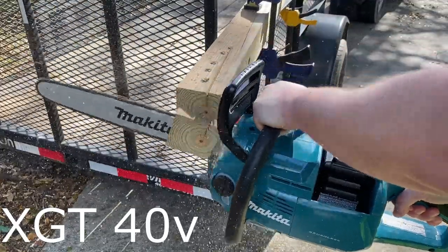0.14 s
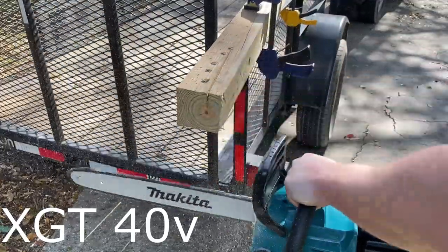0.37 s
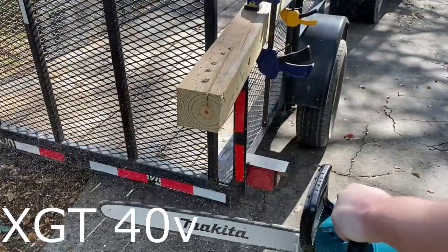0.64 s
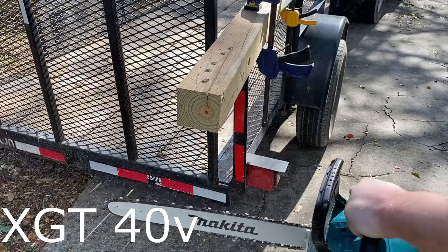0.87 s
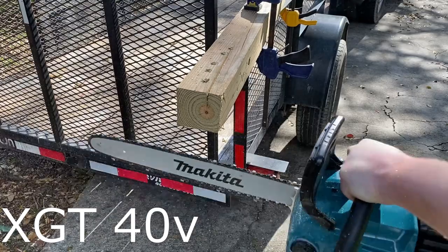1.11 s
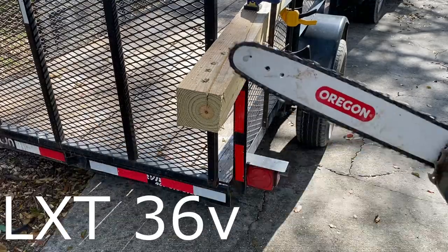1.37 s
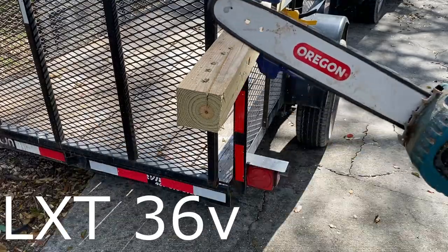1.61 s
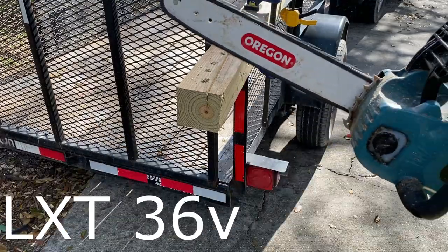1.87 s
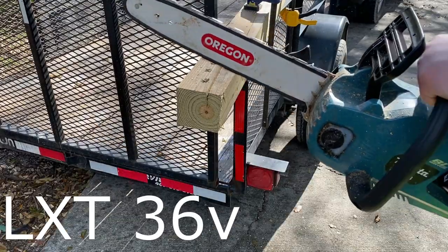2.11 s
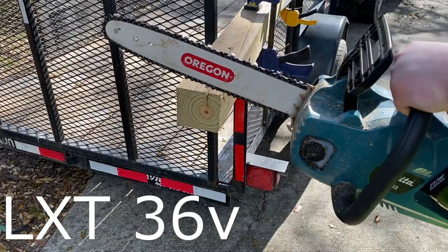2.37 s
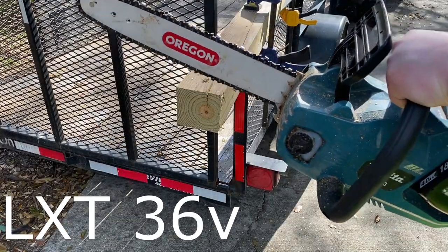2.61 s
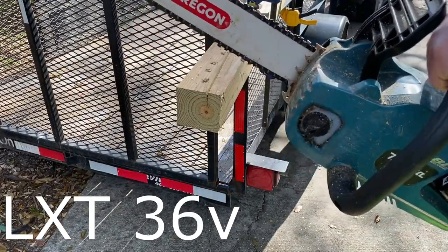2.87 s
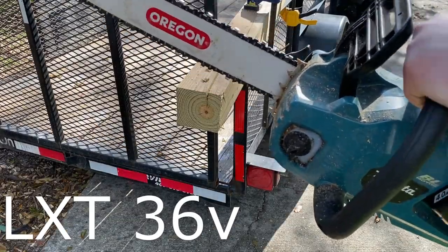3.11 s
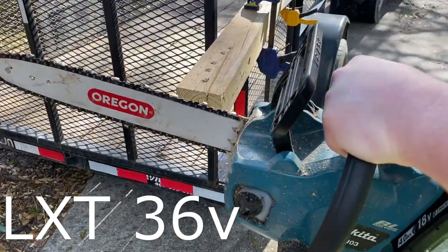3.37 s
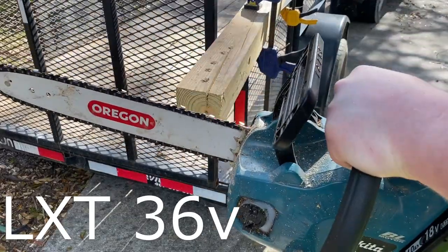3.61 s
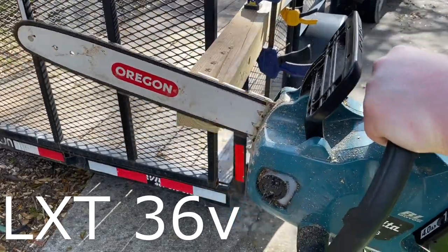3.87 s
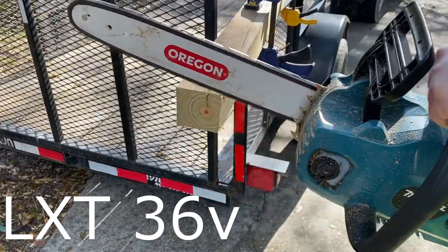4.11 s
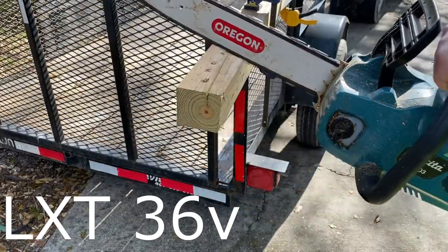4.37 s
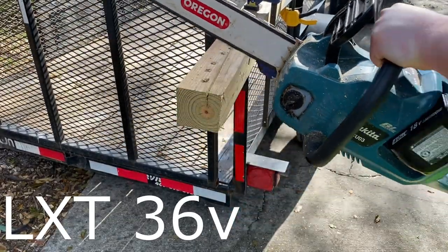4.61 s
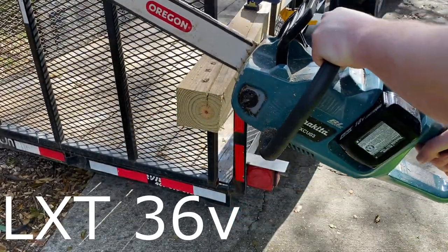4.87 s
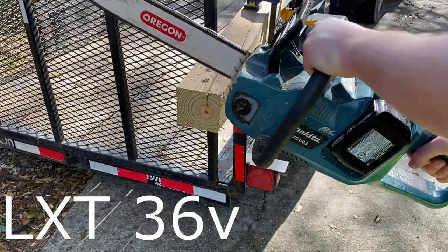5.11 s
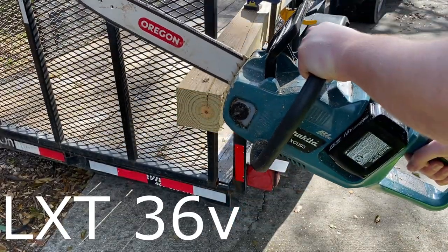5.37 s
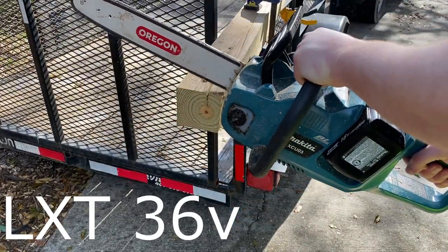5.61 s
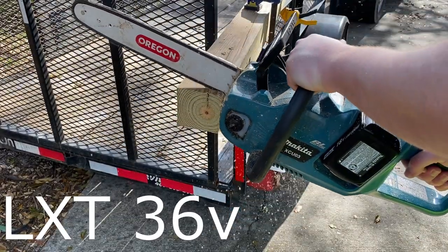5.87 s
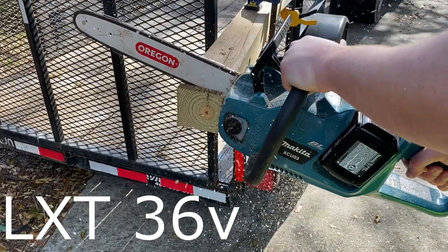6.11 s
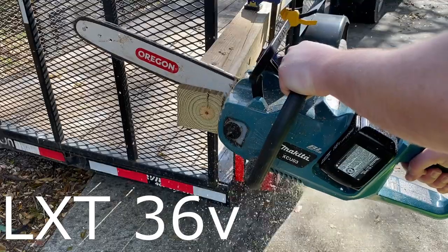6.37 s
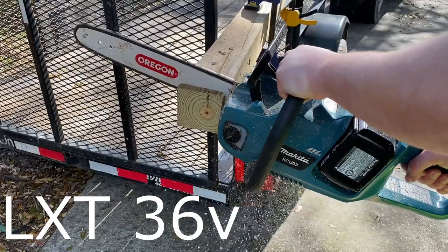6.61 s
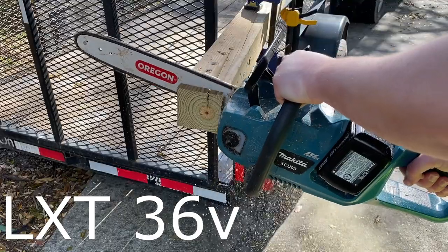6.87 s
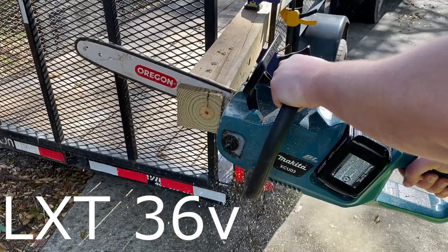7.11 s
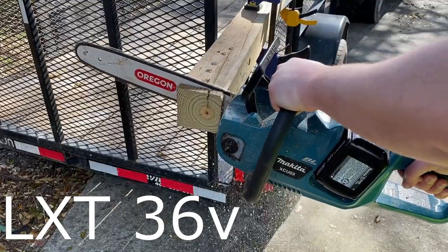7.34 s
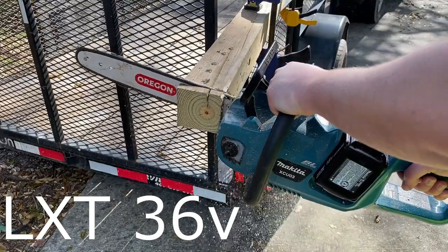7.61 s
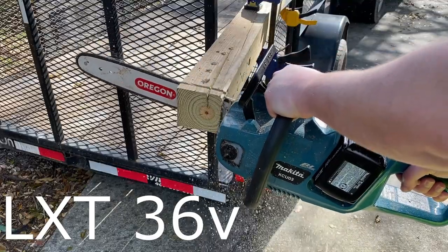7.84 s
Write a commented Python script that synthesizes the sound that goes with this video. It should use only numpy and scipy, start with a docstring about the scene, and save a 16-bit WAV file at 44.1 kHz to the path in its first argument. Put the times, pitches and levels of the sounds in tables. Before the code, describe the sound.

A cordless chainsaw finishes a cut and brakes as the offcut knocks down, then a second saw blips, revs up and grinds into a wooden post.

```python
"""Two cordless chainsaws and a wooden post

Outdoors, one saw finishes a cut and brakes; the offcut falls and bounces. A second saw is blipped twice,
handled in between, then run up and fed into the post, where load drags the whine down.
Saws: noise gated at the tooth rate plus sines at its multiples; knocks: decaying noise bursts; cut: moving
resonances struck by the cutters. Filtered-noise wind and hiss lie underneath; a close mono input overloads softly."""
import sys
import numpy as np
from scipy import signal
from scipy.io import wavfile
from scipy.ndimage import uniform_filter1d

SR = 44100
rng = np.random.default_rng(int(sys.argv[2]) if len(sys.argv) > 2 else 0)


def wav_out(sig):
    """Save sig, one row per channel (or a flat mono array), as 16-bit PCM at SR to the path in sys.argv[1]."""
    wavfile.write(sys.argv[1], SR, np.round(np.clip(np.atleast_2d(sig).T, -1, 1) * 32767).astype(np.int16))


def convert_level_to_amplitude(level_db):
    """Map a level in decibels to its linear amplitude factor."""
    exponent = np.asarray(level_db, float) / 20
    return 10 ** exponent


N = 351918

# second saw's blip, run-up and cut: t/s, tooth rate/(1/s)
BLIP_AND_CUT = [(3.542, 41.3), (3.632, 105), (3.7, 245), (3.77, 449), (3.84, 675), (3.874, 780),
                (3.936, 876), (4.01, 935), (4.062, 887), (4.144, 780), (4.35, 481), (4.5, 266),
                (4.554, 325), (4.67, 695), (4.732, 857), (4.79, 945), (4.866, 1000), (4.978, 1045),
                (5.1, 1077), (5.8, 1073), (5.92, 1033), (6.04, 1000), (6.13, 950), (6.23, 926), (6.38, 922),
                (6.48, 902), (6.69, 888), (6.95, 902), (7.16, 920.5), (7.54, 920), (7.74, 889), (7.78, 860),
                (7.81, 878), (7.98, 894)]
# response of the second housing to a whine: f/Hz, gain/dB
SECOND_HOUSING = [(200, -25), (480, 0), (600, -5), (780, -6), (850, -5), (970, 3), (1090, 0), (1160, -7),
                  (1280, 3), (1400, 7), (1540, 3), (1660, -7), (1770, -2), (1880, -4), (2070, 2),
                  (2300, -8), (2450, -3), (2800, -9), (3300, -3), (3900, 4), (4300, -3.5)]


def evened(x):
    """Scales to rms 1."""
    return x / np.sqrt(np.mean(x ** 2) + 1e-20)


def read(points, x):
    """Interpolates (x, value) points on a log x axis."""
    at, value = np.transpose(points)
    return np.interp(np.log(x + 1), np.log(at + 1), value)


def add(mix, start_s, sound):
    """Mixes a sound in at start_s."""
    part = mix[round(start_s * SR):][:len(sound)]
    part += sound[:len(part)]


def drift(size, hz):
    """Low-passed noise of rms 1 with rates up to about hz."""
    low_pass = signal.butter(2, hz, fs=SR, output="sos")
    return evened(signal.sosfilt(low_pass, rng.standard_normal(size)))


def resonate(x, hz, width_hz):
    """One-pole resonance: shifts the curve hz down to zero, smooths, and shifts back."""
    turn = np.exp(2j * np.pi * np.cumsum(hz * np.ones(len(x))) / SR)
    r = np.exp(-np.pi * width_hz / SR)
    return 2 * (turn * signal.lfilter([1 - r], [1, -r], x / turn)).real


def tone(hz, db, waver_db):
    """A sine on a pitch curve whose strength wavers."""
    turns = np.cumsum(hz) / SR + rng.random()
    strength = convert_level_to_amplitude(db + waver_db * drift(len(hz), 40))
    return np.sqrt(2) * strength * np.sin(2 * np.pi * turns)


def coloured(x, field_db, size=512):
    """Weights each short-time spectrum of x by field_db(Hz, s)."""
    overlap = size * 3 // 4
    hz, s, z = signal.stft(x, SR, nperseg=size, noverlap=overlap)
    weighted = z * convert_level_to_amplitude(field_db(hz[:, None], s))
    return signal.istft(weighted, SR, nperseg=size, noverlap=overlap)[1][:len(x)]


def yard():
    """Distant hiss, faint tones and lumpy wind on the microphone: shaped noise and sines."""
    # distant hiss: f/Hz, relative level/dB
    hiss_colour = [(71, -34), (120, -12.5), (160, -19), (189, -18), (343, -22), (1110, -25.5),
                   (1810, -37.5), (1970, -28), (2090, -34), (9590, -46), (16400, -68)]
    # wind on the microphone: f/Hz, relative level/dB
    wind_colour = [(2.9, -30), (5.0, -2.5), (16, 0), (59, -13), (118, -18), (161, -34.5), (250, -48.5),
                   (320, -80.5), (550, -120)]
    # thin tones from far off: f/Hz, level/dB once swelled in
    far_tones = [(1114, -76), (1911, -70.5), (1997, -80.5), (3822, -83.5)]
    t = np.arange(N) / SR
    hiss = evened(coloured(rng.standard_normal(N), lambda hz, s: read(hiss_colour, hz) + 0 * s, size=1024))
    wind = evened(coloured(rng.standard_normal(N), lambda hz, s: read(wind_colour, hz) + 0 * s, size=8192))
    swell = np.clip(t - 1.27, .1, .4) / .4  # after the first saw
    hum = sum(tone(np.full(N, hz), db, 1.2) for hz, db in far_tones) * swell
    hiss_db = -57 + 4 * (t < 1.27)  # stronger at first
    wind_db = -40 + 2.7 * drift(N, 4.9)
    return convert_level_to_amplitude(hiss_db) * hiss + convert_level_to_amplitude(wind_db) * wind + hum


def echoes(x, level_db, t60_s):
    """Trailer, ground and fences send back a short, dull tail: convolution with decaying noise."""
    t = np.arange(0, .4, 1 / SR)
    noise = resonate(rng.standard_normal(len(t)), 2000, 9000)
    tail = noise * convert_level_to_amplitude(-60 * t / t60_s) * (t > .008)
    return convert_level_to_amplitude(level_db) * signal.fftconvolve(x, tail / np.linalg.norm(tail))[:N]


def knocks():
    """Each knock is a dying band of noise; wood and links share one decay each, hand knocks have their own."""
    # falling wood: t/s, level/dB before the common trim, centre f/Hz, width/Hz
    offcut = [(.548, 2, 2700, 3000), (.819, -10, 2300, 700), (.944, -40, 3020, 900),
              (1.007, -26, 2500, 4000), (1.014, -25, 1000, 1800)]
    # trigger and first links at a start: t/s, level/dB before the common trim, centre f/Hz
    links = [(1.273, -27, 1400), (1.293, -27, 800), (1.312, -28, 1500), (1.331, -28, 4550),
             (3.543, -42, 1500), (3.557, -20, 1960), (3.577, -33, 1400), (3.597, -26, 1500),
             (3.611, -22, 1300), (3.629, -19, 1500)]
    # hands on the housing: t/s, level/dB before the common trim, centre f/Hz, t60/s
    hands = [(2.558, -39, 5000, .013), (2.713, -29, 3000, .1), (2.719, -24, 7000, 0.15),
             (2.735, -18, 1200, 0.045), (2.742, -27, 2000, .06), (2.76, -36, 7500, 0.3),
             (2.856, -44, 6000, 0.092), (2.991, -36, 4000, .12), (3.003, -20, 3000, 0.057),
             (3.052, -40, 5000, .04), (3.169, -22, 6000, 0.013), (3.501, -43, 2500, 0.024)]
    rows = [(s, db, hz, .07, width_hz) for s, db, hz, width_hz in offcut]
    rows += [(*row, .06, 2500) for row in links]
    rows += [(*row, 4500) for row in hands]
    mix, t = np.zeros(N), np.arange(0, .3, 1 / SR)
    trim_db, attack_s = -6.0, 0.00062
    for s, db, hz, t60_s, width_hz in rows:
        burst = evened(resonate(rng.standard_normal(len(t)), hz, width_hz))
        decay = convert_level_to_amplitude(db + trim_db - 60 * t / t60_s)
        add(mix, s, decay * burst * np.minimum(t / attack_s, 1))
    band = signal.butter(2, (250, 11000), "band", fs=SR, output="sos")
    return signal.sosfilt(band, mix)


def bar_ring():
    """The first bar rings on after the brake: a decaying sine."""
    mix, t = np.zeros(N), np.arange(0, .38, 1 / SR)
    start_s, hz, peak_db, t60_s = (.86, 4662, -45, .75)
    ring = convert_level_to_amplitude(peak_db - 60 * t / t60_s) * np.sin(2 * np.pi * hz * t)
    add(mix, start_s, ring * signal.windows.tukey(len(t), .1))
    return mix


def electrics():
    """Windings sing on a rising sine as current surges; the drive whistles as narrow-band noise."""
    # winding surges: t/s, length/s, first f/Hz, starting level/dB before the housing
    surges = [(1.347, .125, 720, -22), (3.661, 0.11, 850, -24), (4.503, 0.09, 1680, -25)]
    # drive whistle at a start: from t/s, to t/s, f/Hz, level/dB
    switching = [(1.274, 1.35, 8050, -49), (3.543, 3.658, 8150, -47)]
    mix = np.zeros(N)
    rise_hz_per_s, fade_db = 22800, -9
    for s, length_s, first_hz, db in surges:
        t = np.arange(0, length_s, 1 / SR)
        hz = first_hz + rise_hz_per_s * t
        level_db = db + read(SECOND_HOUSING, hz) + fade_db * t / length_s
        add(mix, s, tone(hz, level_db, 2.2) * signal.windows.tukey(len(t), .3))
    for start_s, end_s, hz, db in switching:
        noise = rng.standard_normal(round((end_s - start_s) * SR))
        whistle = resonate(resonate(noise, hz, 300), hz, 300)
        add(mix, start_s, convert_level_to_amplitude(db) * evened(whistle))
    return mix


def kerf():
    """Left and right cutters, one each in four teeth, rasp the wood and excite moving resonances."""
    # face of the post, then air in the deepening slot; each: t/s, f/Hz, level/dB
    resonances = [
        [(5.82, 1617, -29), (5.9, 1536, -30), (6.03, 1500, -16), (6.1, 1430, -20), (6.2, 1400, -38)],
        [(6, 3900, -32), (6.3, 4000, -35), (6.5, 4776, -20), (6.8, 4584, -35), (7.2, 4980, -38),
         (7.33, 5477, -25), (7.42, 4600, -21), (7.53, 4110, -26.5), (7.65, 3800, -12), (7.75, 3470, -16.5),
         (7.87, 3303, -15), (7.98, 3120, -13)],
    ]
    mix = np.zeros(N)
    for rows, width_hz in zip(resonances, (290, 550)):
        s, hz, db = np.transpose(rows)
        t = np.arange(s[0], s[-1], 1 / SR)
        turns = np.cumsum(np.interp(t, *np.transpose(BLIP_AND_CUT))) / SR
        left_right = ((1, 0.024), (0.27, 0.45))  # strength, lag in four-tooth cycles
        cutters = sum(size * np.diff(np.floor(turns / 4 + lag), prepend=0) for size, lag in left_right)
        drive = evened(cutters) + .4 * rng.standard_normal(len(t))
        centre_hz = np.interp(t, s, hz)
        rung = evened(resonate(resonate(drive, centre_hz, width_hz), centre_hz, width_hz))
        level_db = np.interp(t, s, db) + 2.5 * drift(len(t), 30)
        add(mix, s[0], convert_level_to_amplitude(level_db) * rung)
    return mix


def saw(run, law, bite_db, whines, housing, orders, free_colour, peaks, spread_db, chatter_db):
    """Links slap the sprocket once a tooth; the shaft sings at multiples of that rate through the housing."""
    # chain in the wood: t/s, share 0-1
    bite_curve = [(0, 0.74), (.1, 1), (.125, 0.01), (5.75, 0.03), (5.9, 1), (6.2, 0.89), (8, 1)]
    # drive settles to its held speed: t/s, share 0-1
    hold_curve = [(4.81, 0.1), (4.89, .8), (5.1, 1)]
    # chain and housing while cutting: f/Hz, relative density/dB
    cut_colour = [(59, -43.5), (100, -13.5), (395, -19), (603, -8), (744, -13.5), (900, -8), (980, -10.5),
                  (1090, -8.5), (1660, -8.5), (1810, -9.5), (2100, -12), (3630, -9.5), (5310, -11.5),
                  (8630, -9), (15600, -18)]
    # response of the post to a whine in the cut: f/Hz, gain/dB
    post = [(450, 0), (880, 1), (925, 1), (955, -5), (1050, 4), (1500, 0), (1770, 3), (1820, -2), (1860, 0),
            (1920, -6), (2070, -3), (2700, 0), (3560, 6), (3620, -5), (3700, 2), (3800, -2), (3970, 5),
            (4300, -6)]
    # second whine swells as the slot deepens: t/s, gain/dB
    deepening = [(7.55, 0), (7.72, 3.5), (8, 5)]
    full_torque = 700  # tooth-rate change that loads the motor fully, 1/s per s
    slack_db = -17  # whines sink as torque passes zero
    pull_db = 2.2  # low drone gains this pulling the chain up to speed, loses it coasting

    s, speed = np.transpose(run)
    t = np.arange(s[0], s[-1], 1 / SR)
    teeth = np.interp(t, s, speed)
    bite = np.interp(t, *np.transpose(bite_curve))
    held = np.interp(t, *np.transpose(hold_curve))
    coasting = uniform_filter1d(1. * (np.gradient(teeth) < 0), size=2000)
    acceleration = uniform_filter1d(np.gradient(teeth) * SR, size=1500)
    torque = np.minimum(abs(acceleration) / full_torque, 1)

    running_db, drone_db = (read(np.array(law)[:, [0, k]], teeth) for k in (1, 2))
    rattle_db = running_db + bite_db[0] * bite
    drone_db = drone_db + bite_db[1] * bite + pull_db * (1 - 2 * coasting) * torque * (1 - bite)

    turns = np.cumsum(teeth) / SR
    strength = convert_level_to_amplitude(spread_db * rng.uniform(-1.3, 1, size=8000))[turns.astype(int)]  # links differ
    strength = strength * convert_level_to_amplitude(3.0 * np.cos(np.pi * turns / 2))  # every fourth link carries a like cutter
    gate = .45
    envelope = 1 - gate + gate * strength * np.exp(-(turns % 1) / 0.31)
    slaps = envelope * rng.standard_normal(len(t))

    def levelled(colour, hz):
        treble_db = np.mean(read(colour, np.linspace(4500, 15600, num=50)))
        return read(colour, np.minimum(hz, 15600)) - treble_db

    def field_db(hz, when):
        share = np.interp(when + s[0], *np.transpose(bite_curve))
        drone = np.interp(when + s[0], t, drone_db) / (1 + (hz / 1500) ** 2) / (1 + (220 / (hz + 1)) ** 4)
        rings = sum(db / (1 + (2 * (hz - f) / w) ** 2) for f, w, db in peaks) * (1 - 0.65 * share)
        return (1 - share) * levelled(free_colour, hz) + share * levelled(cut_colour, hz) + drone + rings

    def state_db(rising, falling, steady, cutting):
        moving = rising + coasting * (falling - rising) + slack_db * (1 - torque) ** 2
        unloaded = (1 - held) * moving + held * steady
        # whines fade by this share of the rattle's fall at low speed: speeding up, coasting
        fade_share = np.interp(coasting * (1 - held), (0, 1), (.45, .75))
        return unloaded + bite * (cutting - unloaded) + fade_share * (running_db - law[-1][1])

    def path_db(k):
        through_post = read(post, k * teeth) + (k == 2) * np.interp(t, *np.transpose(deepening))
        return (1 - bite) * read(housing, k * teeth) + bite * through_post

    rattle = convert_level_to_amplitude(rattle_db + 0.5) * coloured(evened(slaps), field_db)
    waver_db = 1.8 - 1.0 * held + chatter_db * bite
    whine = sum(tone(k * teeth, state_db(*db) + path_db(k), waver_db) for k, *db in whines)
    speed_db = 50 * np.log10(teeth / teeth.max())  # high weak whines only stand out near full speed
    weak = 0
    for k, free_db, cut_db in orders:
        order_db = free_db + bite * (cut_db - free_db) + (1 - bite) * speed_db * min(k / 6, 1)
        weak = weak + tone(k * teeth, rattle_db + order_db, 3.43)
    fade = np.clip(np.minimum(t - s[0], s[-1] - t) / 0.0018 + .01, 0, 1)
    return s[0], (rattle + whine + weak) * fade


def first_saw():
    """Leaves the wood, speeds up, then brakes; rattle and whine follow the tooth rate."""
    # run: t/s, tooth rate/(1/s)
    run = [(0, 490), (.026, 501), (.104, 520), (.142, 559), (.21, 637), (.294, 644.5), (.384, 590),
           (.498, 518), (.598, 478), (.708, 330), (.83, 207), (.89, 177)]
    # loudness law: tooth rate/(1/s), base rattle level/dB, base low-drone lift/dB
    law = [(177, -39, 14), (212, -30, 14), (300, -22, 4), (470, -15.5, -2.5), (557, -13.5, -1.5),
           (640, -12.5, -1.5)]
    # main whines before housing or post: multiple of tooth rate, base level/dB speeding up, coasting, held, cutting
    whines = [(1, -23, -24, -24, -15), (2, -15, -18, -18, -24.5), (3, -25, -24, -24, -26),
              (4, -24, -24, -24, -26), (6, -21, -30, -30, -30), (8, -22, -31, -31, -30)]
    # housing response: f/Hz, gain/dB
    housing = [(200, -22), (420, -6), (500, -7), (580, 4), (640, 5), (710, 9), (850, -8), (960, 0),
               (1040, -4), (1150, 3), (1270, 2), (1400, 4), (1600, 0), (1780, 4), (1900, -2), (2200, 1),
               (2550, -2), (2750, 5), (3300, -6), (3800, 2), (4300, -5), (4700, 2), (5200, 0)]
    # weak whines: multiple of tooth rate, level/dB re rattle at full speed running free, cutting
    orders = [(5, -26, -13)]
    # chain and housing running free: f/Hz, relative density/dB
    free_colour = [(59, -61.5), (100, -32), (468, -18), (603, -6), (729, -14.5), (1020, -9), (1210, -8),
                   (1340, -12.5), (1770, -10), (1930, -13), (2480, -8.5), (3340, -16), (3870, -12.5),
                   (7140, -11.5), (15600, -22.5)]
    mix = np.zeros(N)
    bite_db = (4, 11)  # cutting adds to rattle, low drone
    add(mix, *saw(run, law, bite_db, whines, housing, orders, free_colour, [], spread_db=5, chatter_db=4.5))
    return mix


def second_saw():
    """Two blips, then a run-up into the post; the tooth rate, and the whine with it, falls under load."""
    # first blip: t/s, tooth rate/(1/s)
    blip = [(1.272, 43), (1.314, 75), (1.4, 246), (1.464, 430), (1.516, 602), (1.594, 829), (1.658, 933),
            (1.718, 989), (1.755, 1008), (1.806, 966), (1.902, 836), (2.046, 638), (2.182, 430),
            (2.27, 290), (2.31, 200), (2.36, 30)]
    # loudness law: tooth rate/(1/s), base rattle level/dB, base low-drone lift/dB
    law = [(30, -62.5, 23.5), (80, -58.5, 34), (260, -31, 13), (380, -24, 11.5), (530, -20.5, 5),
           (700, -15, 2), (950, -13, -4), (1090, -12.5, -6)]
    # main whines before housing or post: multiple of tooth rate, base level/dB speeding up, coasting, held, cutting
    whines = [(.5, -39, -36, -34, -41), (1, -33, -28, -15.5, -21), (4 / 3, -27, -32, -42, -42),
              (2, -20.5, -15.5, -38, -19.5), (3, -32, -24, -28, -35), (4, -28, -26, -25, -27.5)]
    # weak whines: multiple of tooth rate, level/dB re rattle at full speed running free, cutting
    orders = [(1.5, -23, -21), (5 / 3, -27, -25.5), (2.5, -26, -24), (3.5, -22, -27), (4.1, -27, -25),
              (5, -18, -20), (6, -15, -23), (7.6, -14, -30), (8, -18, -26)]
    # chain and housing running free: f/Hz, relative density/dB
    free_colour = [(59, -65), (100, -36), (403, -17.5), (531, -17), (670, -16), (980, -7), (1040, -9),
                   (1160, -9), (1850, -9), (2280, -15), (3790, -13.5), (8630, -12.5), (15600, -17.5)]
    # bar and chain-cover peaks, weaker in the wood: f/Hz, width/Hz, free gain/dB
    peaks = [(1400, 350, 0), (3810, 500, 6.5), (4840, 200, 3.5), (5640, 230, -0.5), (7370, 300, 2.5),
             (8600, 810, 6.5), (11200, 490, 4), (14100, 600, 2.5)]
    mix = np.zeros(N)
    bite_db = (2.5, 3.5)  # cutting adds to rattle, low drone
    for run in (blip, BLIP_AND_CUT):
        add(mix, *saw(run, law, bite_db, whines, SECOND_HOUSING, orders, free_colour, peaks,
                      spread_db=4, chatter_db=.8))
    return mix


def scene():
    """Both saws, the cut, small knocks and the yard, alike in both channels."""
    near = knocks() + bar_ring() + electrics() + kerf() + first_saw() + second_saw()
    mix = near + echoes(near, level_db=-19, t60_s=0.29) + yard()
    return np.array([mix, mix])


def top_cut(x):
    """Nothing passes above the cut-off."""
    return signal.sosfilt(signal.butter(12, 16520, fs=SR, output="sos"), x)


def record(dry):
    """The input stage rounds off the loudest peaks; then a low-pass limits the band."""
    ceiling = .88
    rounded = dry / (1 + abs(dry / ceiling) ** 4) ** (1 / 4)
    low_pass = signal.firwin(255, 15900, window=("kaiser", 7), fs=SR)[None]
    finished = signal.oaconvolve(rounded, low_pass, "same")
    return top_cut(finished)


dry = scene()
out = record(dry)
wav_out(out)
```